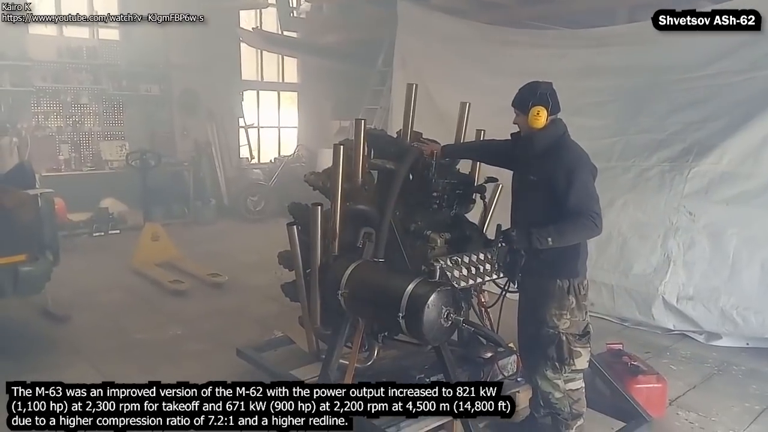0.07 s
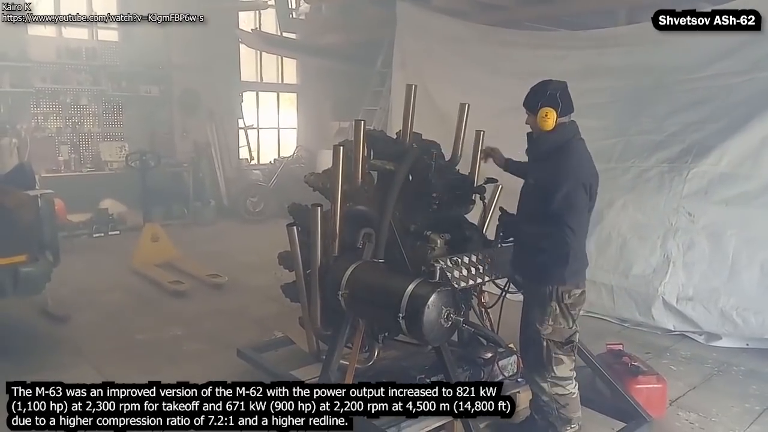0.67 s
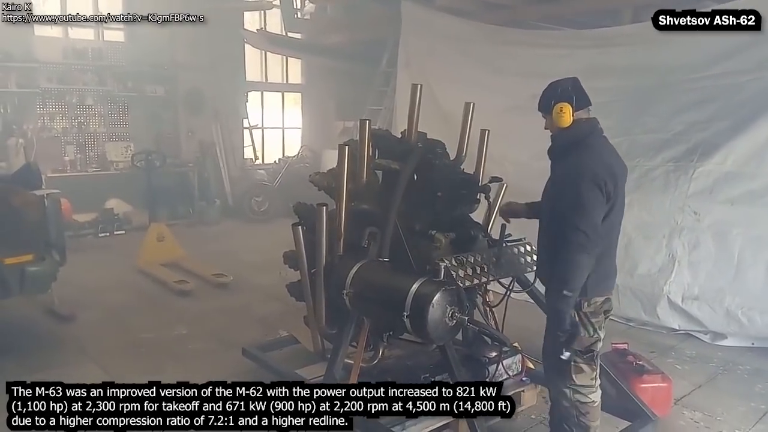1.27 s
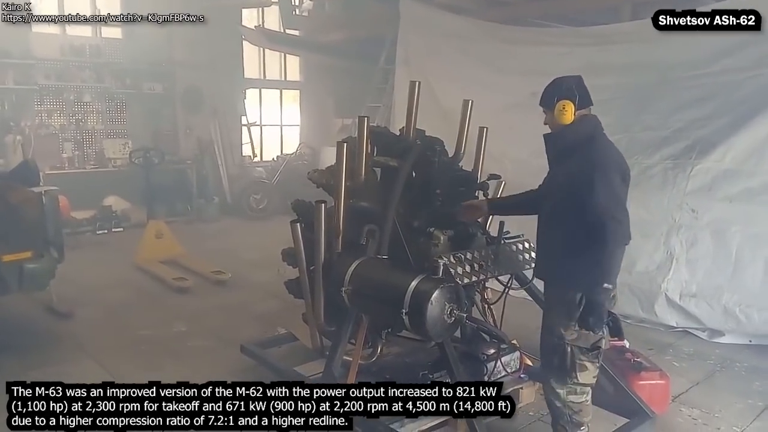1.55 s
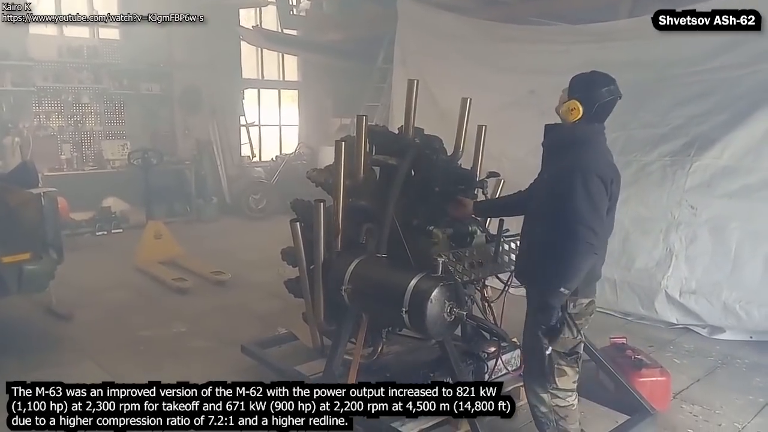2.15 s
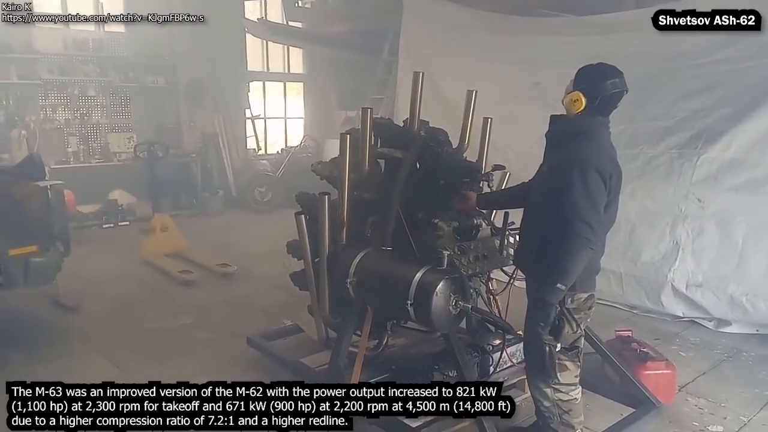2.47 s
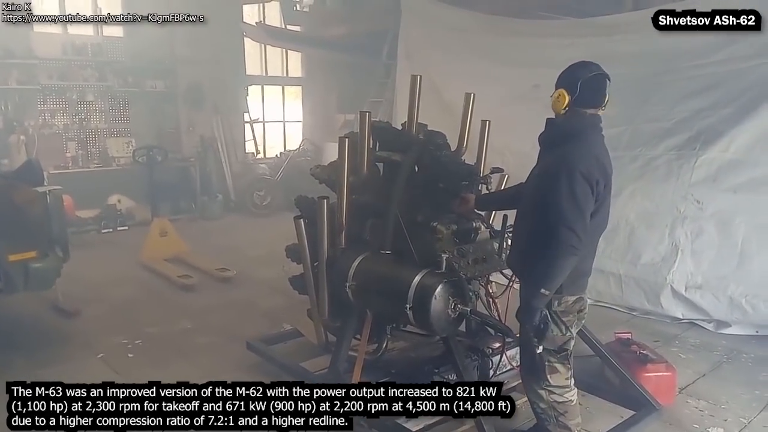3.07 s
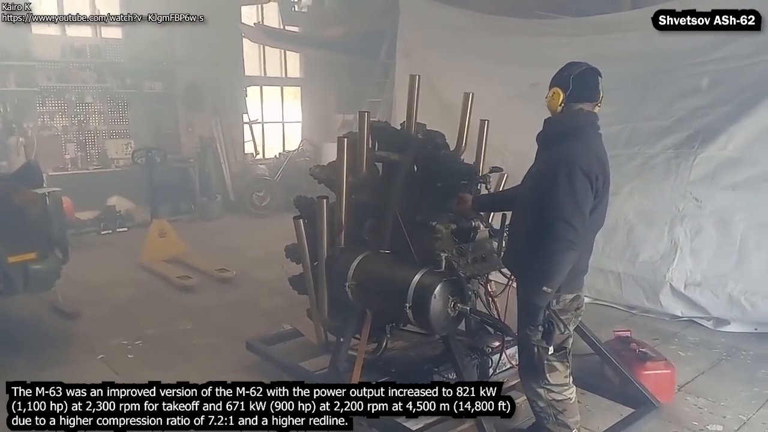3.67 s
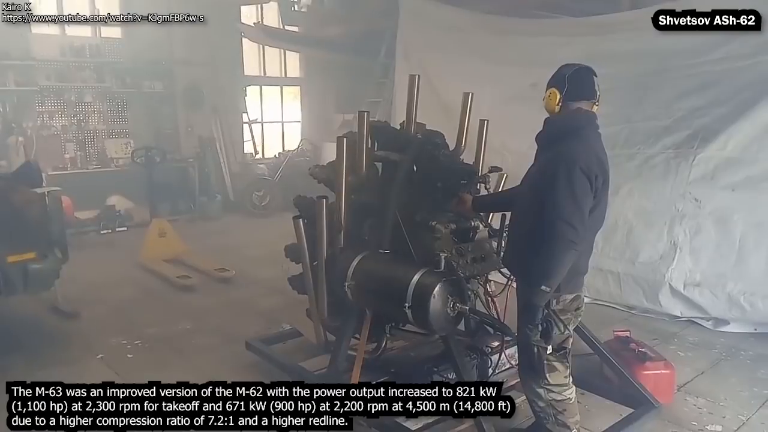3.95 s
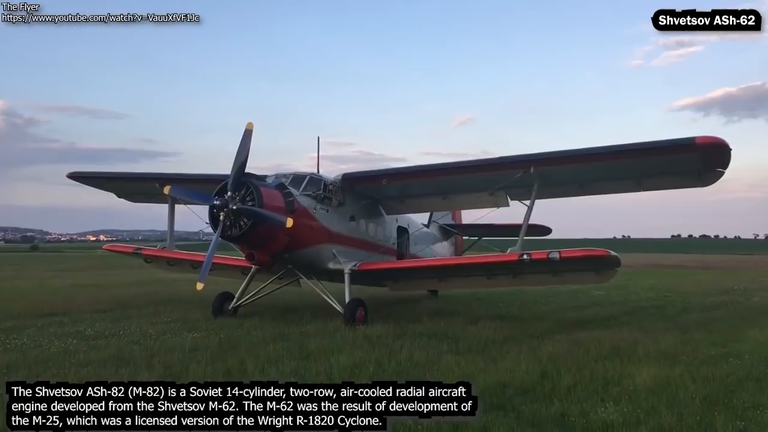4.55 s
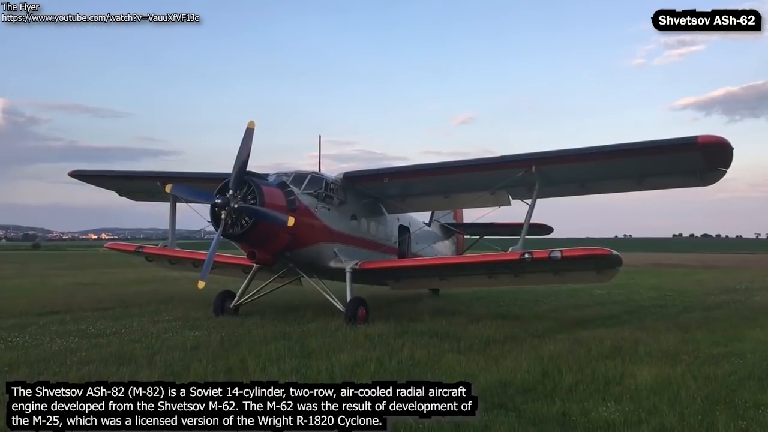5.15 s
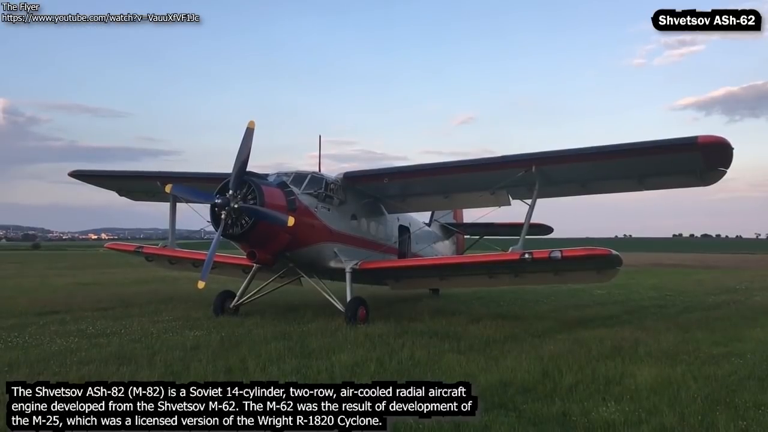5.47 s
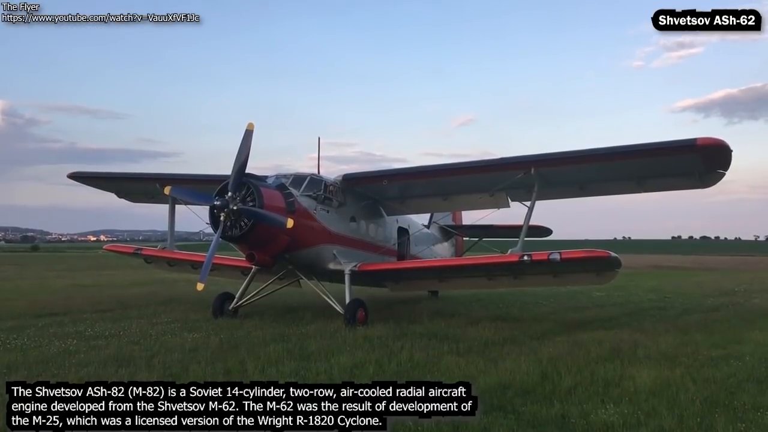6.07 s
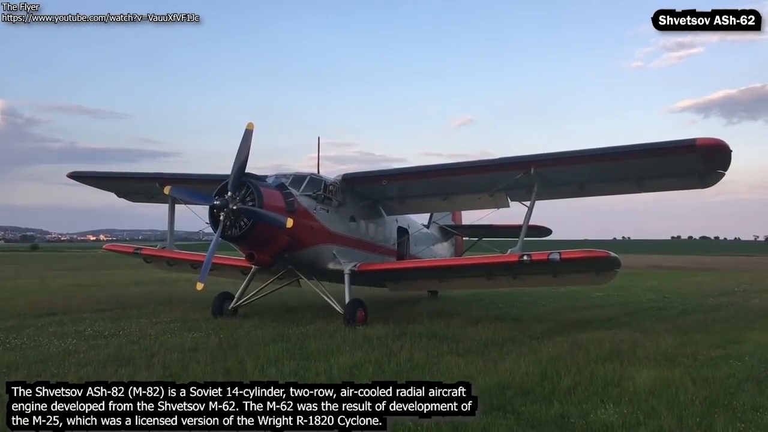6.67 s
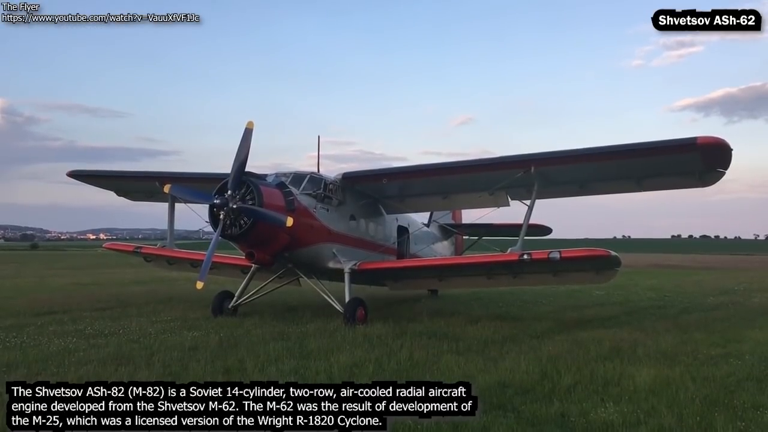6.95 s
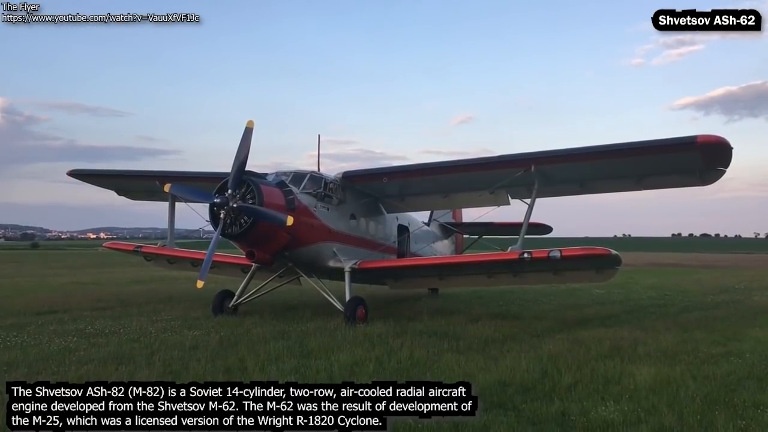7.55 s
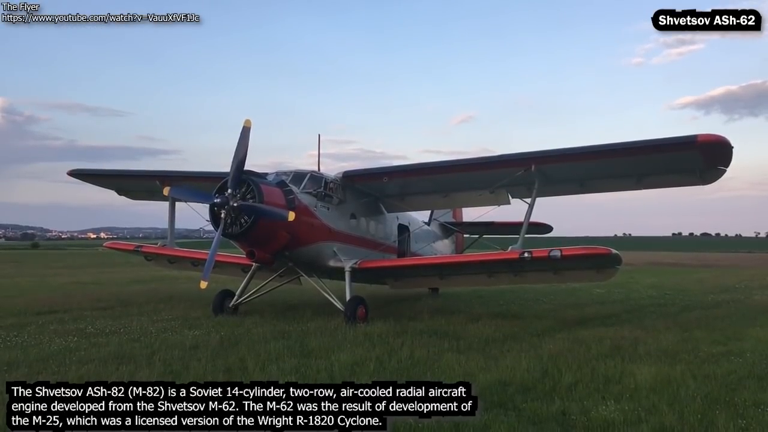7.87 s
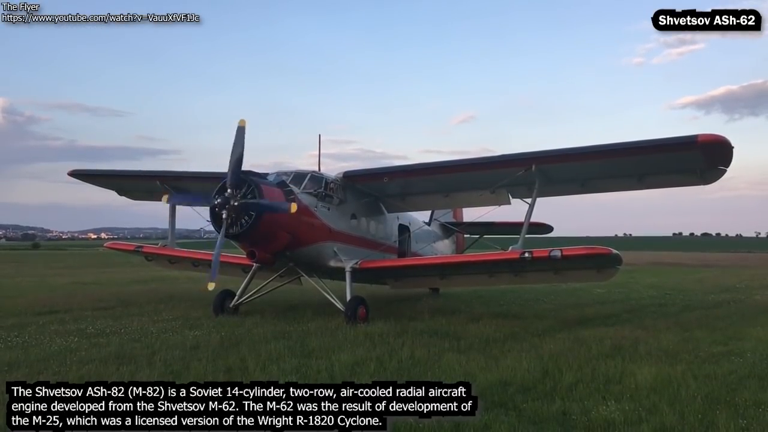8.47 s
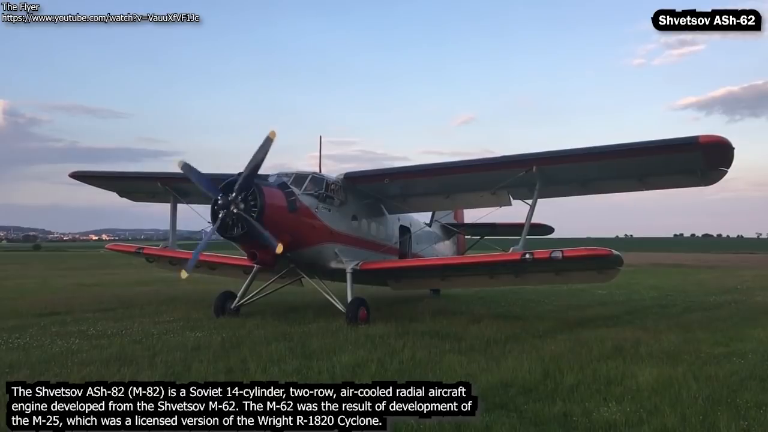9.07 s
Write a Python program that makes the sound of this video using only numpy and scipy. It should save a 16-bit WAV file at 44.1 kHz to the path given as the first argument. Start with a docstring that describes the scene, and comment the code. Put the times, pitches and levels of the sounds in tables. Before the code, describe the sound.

A large radial aircraft engine roars steadily in a booming workshop, so close that the microphone distorts. The roar cuts off abruptly about halfway through. Outdoors, a biplane's flywheel starter hums faintly, rising slightly in pitch. Its clutch engages with a clank, the gears whine downward with a brief squeal, and the cold engine turns over with metallic clacks and soft chuffs of air.

```python
"""A nine-cylinder radial engine roars through open stacks in a workshop, so close that the mic overloads.
Each firing is a burst of gas noise over the boom of the room; the roar breaks off abruptly.
Then, out on an airfield, a biplane's inertia starter winds up its flywheel with a faint rising whine.
The clutch bangs in, the loaded gears sing downwards, and the cold engine clacks and chuffs as it turns."""
import sys
import numpy as np
from scipy import signal
from scipy.fft import rfft, irfft, next_fast_len
from scipy.io import wavfile

SR = 44100
rng = np.random.default_rng(int(sys.argv[2]) if len(sys.argv) > 2 else 0)


def unload_wav(signal):
    """Save mono or channel-first audio to the path in sys.argv[1] as 16-bit WAV at rate SR, clipped to [-1, 1]."""
    wavfile.write(
        sys.argv[1],
        SR,
        np.round(np.clip(np.atleast_2d(signal).T, -1, 1) * 32767).astype(np.int16),
    )


N = 410571
T = np.arange(N) / SR
ROAR_END_S, LEVER_S, CLUTCH_S = 4.4975, 7.47, 7.868


def from_db(db):
    """Decibels to gain."""
    return 10 ** (np.asarray(db) / 20)


def rms_one(x):
    """Scale to unit power."""
    return x / np.sqrt(np.mean(x ** 2) + 1e-20)


def in_time(rows):
    """A (time_s, value) curve at every sample."""
    return np.interp(T, *np.transpose(rows))


def between(start, end, fade):
    """A gate that opens at start and closes at end."""
    return np.clip((T - start) / fade, 0, 1) * np.clip((end - T) / fade, 0, 1)


def swell(s, half):
    """A smooth bump of height 1 around a moment."""
    return np.exp(-((T - s) / half) ** 2)


def since(s):
    """Seconds gone by after a moment, 0 before it."""
    return np.maximum(T - s, 0)


def coloured(x, colour):
    """Filter with a (freq_hz, gain_db) response."""
    points, db = np.transpose(colour)
    size = next_fast_len(N + SR // 4, True)
    hz = np.maximum(np.arange(size // 2 + 1) * SR / size, 1)
    gain = from_db(np.interp(np.log(hz), np.log(points), db))
    return irfft(rfft(x, size) * gain, size)[:N]


def noise(colour):
    """Noise with a (freq_hz, level_db) spectrum; rms 1."""
    return rms_one(coloured(rng.standard_normal(N), colour))


def drift(rate_hz):
    """A random wander with spread 1, mostly slower than rate_hz."""
    hop, settle = 40, 2000
    r = np.exp(-2 * np.pi * rate_hz * hop / SR)
    slow = signal.lfilter([1], [1, -2 * r, r * r], rng.standard_normal(N // hop + settle + 2))[settle:]
    return np.interp(np.arange(N) / hop, np.arange(len(slow)), rms_one(slow))


def tone(turns, multiple, waver, rate_hz):
    """A partial of a turning shaft whose strength wavers; rms about 1."""
    sine = np.sqrt(2) * np.sin(2 * np.pi * (multiple * turns + rng.random()))
    return sine * (1 + waver * drift(rate_hz)) / np.hypot(1, waver)


def resonate(x, hz, width):
    """A two-pole resonance that passes the same noise power at any width."""
    r = np.exp(-np.pi * width / SR)
    zeros = np.sqrt((1 - r * r) / 2) * np.array([1, 0, -1])
    return signal.lfilter(zeros, [1, -2 * r * np.cos(2 * np.pi * hz / SR), r * r], x)


def ticks(t60_s=.07, width_hz=5000):
    """Small steel parts touch with a brief bright splash."""
    # linkage and valve gear: start_s, level_db, ring_hz
    touches = [(7.78, -51, 9500), (7.869, -35, 10000), (8.876, -58, 12000), (8.963, -49, 13000),
               (9.002, -47, 12000), (9.101, -48, 13000), (9.118, -53, 9000), (9.222, -53, 6800),
               (9.258, -54, 12000)]
    out = np.zeros(N)
    for s, db, hz in touches:
        decay = from_db(db - 60 * np.clip(T - s, 0, .5) / t60_s) * (T >= s)
        out += resonate(decay * rng.standard_normal(N), hz, width_hz)
    return out


def turning_over(pumping_db=-60.5, rise_db_per_s=13.5, rattle_db=-46.3):
    """The pistons pump more and more air as the engine comes round, and the gear train rattles."""
    # soft thumps and chuffs of air: centre_s, level_db, half_length_s
    puffs = [(5.28, -49, .056), (6.62, -49, .056), (7.821, -47, .02), (7.897, -34, .028), (7.97, -46, .05),
             (8.42, -51, .06), (8.57, -45, .05), (9.02, -43, .07), (9.25, -41, .045)]
    # spectra of the air and the rattle: freq_hz, level_db
    air_colour = [(25, -34), (60, -8), (100, -5), (150, -11), (300, -30), (800, -55)]
    rattle_colour = [(120, -38), (200, -3), (288, -4), (414, 2), (769, -4), (1090, 0), (2130, -11),
                     (2650, -22), (5110, -33), (15500, -35)]
    pumping = from_db(pumping_db + rise_db_per_s * since(CLUTCH_S)) * (T >= CLUTCH_S)
    chuffs = sum(from_db(db) * swell(s, half) for s, db, half in puffs)
    rattle = from_db(rattle_db + 1.5 * drift(25)) * noise(rattle_colour)
    return (pumping + chuffs) * noise(air_colour) + rattle * np.clip(since(8.8) / .071, 0, 1)


def knocks(rise_s=.001, clatter=.29, dull_hz=8000):
    """Each blow is a short clatter that dies away in the modes of the case, the high ones first."""
    # blows of clutch and gear train: start_s, relative_db, lows_db, highs_db, t60_s at 1500 Hz
    blows = [(7.451, -41.5, 19, -8, .22), (7.867, -20, 10.5, 7.5, 0.16), (7.883, -26, -11, 6, 0.25),
             (8.803, -28.5, 2, 5, 0.16), (8.907, -32.5, -1, -5, .12), (8.986, -34, 3, -4, 0.14),
             (9.025, -28.5, -1, -8, .14), (9.122, -30.5, -2, -1, 0.11), (9.150, -29.5, 2, -8, 0.1),
             (9.164, -39, 10, -11, 0.092), (9.2207, -15.5, -3, -12, 0.11)]
    # ring of the engine case and cowling: pitch_hz, width_hz, gain_db
    case_modes = [(560, 120, -9), (890, 41, -12), (1130, 200, -10), (1600, 160, -2.5), (1850, 190, -6.5),
                  (3200, 530, -12), (4060, 450, -14), (6800, 1600, -13)]
    out = np.zeros(N)
    for hz, width, mode_db in case_modes:
        force = np.zeros(N)
        for s, db, lows_db, highs_db, t60 in blows:
            at = int(s * SR)
            age = T[:min(N - at, SR // 2)]
            colour_db = np.interp(np.log(hz), np.log([550, 1500, 6000]), [lows_db, 0, highs_db])
            decay_db = 60 * age / (t60 * (hz / 1500) ** -.25)
            attack = 1 - np.exp(-age / rise_s)
            force[at:at + len(age)] += from_db(db + mode_db + colour_db - decay_db) * attack
        out += resonate(force * rng.standard_normal(N) * (1 + clatter * drift(190)), hz, width)
    return from_db(-5.5) * signal.sosfilt(signal.butter(2, dull_hz, fs=SR, output="sos"), out)


def housing(hz):
    """Decibels that the starter housing adds to a tone at this pitch."""
    # peaks and dips: centre_hz, half_width_hz, gain_db
    resonances = [(245.5, 6, 15), (260.2, 4, 18), (269.8, 1.6, -10), (283.7, 10, 11), (464, 14, 13.5),
                  (513, 13, 13), (554, 2.6, -5), (826, 5, 11), (2245, 47, 17), (2430, 130, 9.5),
                  (2740, 35, 4), (5220, 220, 10), (7400, 170, 5), (8330, 130, 7)]
    grid = np.arange(SR // 2)
    response_db = sum(db * np.exp(-((grid - centre) / half) ** 2) for centre, half, db in resonances)
    return np.interp(hz, grid, response_db)


def flywheel_speed(start_hz=267.14, rise_hz_per_s=6.548, easing_hz_per_s2=.99):
    """Turns per second: a flattening rise, then braking once the clutch is in."""
    # the engine drags the flywheel down: time_s, speed_hz
    braking = [(7.868, 283.6), (8.0, 274.3), (8.22, 261.6), (8.4, 249.5), (8.6, 235), (8.72, 223),
               (8.9, 212), (9.31, 205)]
    age = since(ROAR_END_S)
    rising = start_hz + rise_hz_per_s * age - easing_hz_per_s2 * age ** 2 / 2
    return np.where(T < CLUTCH_S, rising, in_time(braking))


def winding_up(turns, speed, whirr_db=-49, hiss_db=-58, bearing_lift_db=2):
    """The flywheel hums with its unbalance while the gears and bearings run free."""
    # unbalance hum, first partial upwards: level_db, lift_db once the clutch lever is pulled
    hum_partials = [(-56.5, 3.5), (-54, -1.5), (-66.5, 18)]
    # free-running gear train: flywheel_multiple, level_db
    gear_tones = [(1.27, -62.5), (1.66, -63), (3.34, -65), (3.46, -63), (3.66, -61), (4, -66), (5, -63),
                  (10, -72), (11, -69), (12, -71), (13, -75)]
    # spectra of the bearings: freq_hz, level_db
    whirr_colour = [(25, -24), (65, 1), (140, 0), (230, -9.5), (480, 1), (750, -4.5), (970, 1), (1200, -11),
                    (1700, -1), (2100, -8), (2550, -17), (2880, -14), (3080, -7), (3650, -10.5),
                    (4300, -15), (9000, -36)]
    hiss_colour = [(1500, -27), (4500, -1.5), (7000, -3.5), (15000, -12)]
    lever = np.clip(since(LEVER_S) / .08, 0, 1)
    hum = sum(from_db(db + lift_db * lever + housing(k * speed))
              * tone(turns, k, waver=.035 * k * k, rate_hz=9.1)
              for k, (db, lift_db) in enumerate(hum_partials, 1))
    backlash = turns + .0098 * drift(5.2)   # play between the teeth lets the gears wander
    gears = sum(from_db(db) * tone(backlash, k, waver=.78, rate_hz=3.9) for k, db in gear_tones)
    # three gear tones swell briefly together midway through the wind-up
    swelling = from_db(-65 + 5.6 * swell(6.25, .35))
    gears += swelling * sum(tone(backlash, k, waver=.6, rate_hz=18) for k in (7.29, 7.7, 11.6))
    # a thin bearing whistle dies out early
    whistle = from_db(-68 - 40 * since(5.35)) * resonate(rng.standard_normal(N), hz=7070, width=60)
    whirr = from_db(whirr_db + .6 * drift(12)) * noise(whirr_colour)
    hiss = from_db(hiss_db - since(ROAR_END_S) + 1.2 * drift(25)) * noise(hiss_colour)   # fades 1 dB/s
    bearings = from_db(bearing_lift_db * lever) * (whirr + hiss) * (T >= ROAR_END_S)
    return (hum + gears + whistle) * between(ROAR_END_S, CLUTCH_S + .028, .008) + bearings


def loaded_gears(turns, speed, teeth=10, pinion_ratio=1.93, runout=.14, echo_s=.022, echo_db=-6):
    """The pinion sings under load; torsional shake blurs its upper partials and runout adds side tones."""
    # gear mesh, first partial upwards: level_db, lift_db in the squeal where the teeth bite hardest
    mesh_partials = [(-43.5, 0), (-48, 3), (-51.5, 13.5), (-59, 11), (-69, 12), (-71, 12)]
    # load on the gears, heard as grinding: time_s, relative_db
    load = [(7.95, -37.5), (8.104, -41), (8.282, -35.5), (8.322, -39), (8.38, -35), (8.66, -39.5),
            (8.77, -43.5)]
    # side tones: flywheel_multiple, relative_db
    side_tones = [(3.85, -13), (8.05, -12), (9, -17), (11, -15), (12, -17), (19, -19), (21, -19), (29, -17)]
    # spectrum of the grinding: freq_hz, level_db
    grind_colour = [(35, -42), (60, -27), (156, -3.5), (210, -17), (253, -11.5), (291, -13.5), (497, 0),
                    (721, -8.5), (2200, -2.5), (2410, -25), (2910, -10), (5200, -16), (9200, -18.5),
                    (11000, -26), (15500, -31)]
    squeal = swell(8.68, .115)
    release_db = -57 * since(8.77)   # the tones die away, the upper mesh partials fastest
    shaken = turns + .004 * drift(23) + .0075 * squeal * drift(60) + .0018 * drift(200)
    mesh = sum(from_db(db + lift_db * squeal + k * release_db + housing(teeth * k * speed))
               * tone(shaken, teeth * k, waver=.24 * k, rate_hz=30)
               for k, (db, lift_db) in enumerate(mesh_partials, 1))
    # the sweeping tones beat with their own echo off the wing
    mesh += from_db(echo_db) * np.interp(T - echo_s, T, mesh)
    shaft = from_db(-59.5 + release_db + housing(speed)) * tone(turns, 1, waver=.25, rate_hz=12)
    pinion = from_db(-48.5 + release_db + housing(pinion_ratio * speed))
    pinion *= tone(shaken, pinion_ratio, waver=.37, rate_hz=30)
    load_db = in_time(load) + release_db
    sides = sum(from_db(db) * tone(shaken, k, waver=.63, rate_hz=6.9) for k, db in side_tones)
    sides *= from_db(load_db + 1.5)
    grind = from_db(load_db + 3 + drift(40)) * noise(grind_colour)
    grind *= 1 + runout * np.sin(2 * np.pi * turns)
    return (mesh + sides + shaft + pinion + grind) * between(CLUTCH_S, 8.94, .058)


def overload(x, ceiling=.6, hardness=4):
    """So close to the stacks the microphone flattens every peak; its response colours the distortion."""
    # microphone response: freq_hz, gain_db
    microphone = [(4000, -0.5), (6700, -1.5), (8000, -7.5), (13900, -7.5), (14700, 0), (15900, 0)]
    flattened = x / (1 + np.abs(x / ceiling) ** hardness) ** (1 / hardness)
    return coloured(flattened, microphone)


def radial_engine(blast_s=.0029, uneven_db=3.5, sputter_db=.5, bark_half_s=.043):
    """Every firing lets out a burst of gas noise; the workshop booms on the engine's orders."""
    # four-stroke cycle rate: time_s, rate_hz
    cycle_rate = [(0, 21.85), (.7, 21.72), (1.2, 21.76), (1.8, 21.85), (2.5, 21.75), (3.3, 21.84),
                  (4.5, 21.83)]
    # cylinders in firing order: blast_db, stack_lag as a share of the firing interval
    cylinders = [(6, 0.04), (-10, .3), (-4, .55), (-4.5, 0.21), (5, .05), (5.5, 0.53), (-5.5, .3),
                 (3.5, .15), (-4, .5)]
    # the loudest exhaust barks: centre_s, lift_db
    barks = [(0.224, 1), (0.472, 1), (0.685, 6), (1.05, 4), (1.41, 1), (2.158, 3), (2.39, 2), (2.86, 1.5),
             (3.2, 2), (3.58, 3.5), (4.025, 2.5), (4.18, 3.5)]
    # boom of the stacks in the room: cycle_multiple, relative_db
    orders = [(2, -10), (4, -7.5), (5, -2), (6, -9), (7, -10), (8, -8.5), (9, 0), (10, -5), (11, -2.5),
              (12, -9), (13, -4.5), (14, -5), (15, -7.5), (16, -9.5), (17, -8), (19, -3), (20, -12.5),
              (22, -6), (23, -10.5), (25, -8), (26, -9), (28, -7.5)]
    # spectra of the exhaust blast and the rumble: freq_hz, level_db
    blast_colour = [(200, -16), (700, -7), (1400, -3), (2300, -3.5), (3800, -0.5), (4500, -2.5),
                    (5200, -7.5), (6700, -12.5), (7400, -26), (9000, -47)]
    rumble_colour = [(15, -19.5), (40, -2), (100, 1.5), (300, 1), (750, -2), (1400, -6), (3000, -16.5),
                     (8000, -48)]
    speed = in_time(cycle_rate)
    cycles = np.cumsum(speed * (1 + .002 * drift(3.74))) / SR
    bursts = 0
    for k, (db, lag) in enumerate(cylinders):
        firing, phase = np.divmod(cycles + 1 - (k + lag) / len(cylinders), 1)
        chance_db = uneven_db * rng.standard_normal(N // 1000)[firing.astype(int)]
        bursts += from_db(db + chance_db) * np.exp(-phase / speed / blast_s)
    # between the barks the mixture burns unevenly
    surge = from_db(sputter_db * drift(8) + sum(db * swell(s, bark_half_s) for s, db in barks))
    gas = surge * rms_one(np.hypot(rms_one(bursts), 1))   # the room fills the gaps at equal power
    boom = rms_one(sum(from_db(db) * tone(cycles, k, waver=.43, rate_hz=6.8) for k, db in orders))
    exhaust = gas * noise(blast_colour)
    return from_db(-1.16) * exhaust + from_db(-5) * noise(rumble_colour) + from_db(-8.5) * boom


def scene():
    """In mono: the engine close up in the workshop, then the starter on the airfield."""
    speed = flywheel_speed()
    turns = np.cumsum(speed * (1 + .00046 * drift(4.2))) / SR
    workshop = overload(radial_engine()) * (T < ROAR_END_S)
    airfield = winding_up(turns, speed) + loaded_gears(turns, speed) + knocks() + ticks() + turning_over()
    return (workshop + airfield)[None]


def record(dry):
    """The top is cut steeply."""
    cutoff_hz = 15750
    taps = signal.firwin(1201, cutoff_hz, fs=SR, window=("kaiser", 9))
    return signal.fftconvolve(dry, taps[None], mode="same", axes=1)


dry = scene()
out = record(dry)
unload_wav(out)
```